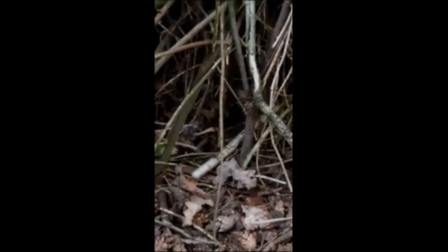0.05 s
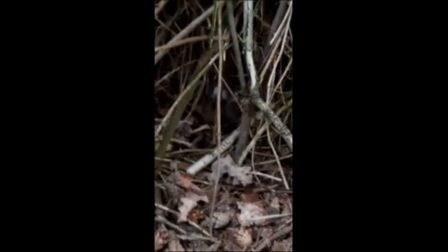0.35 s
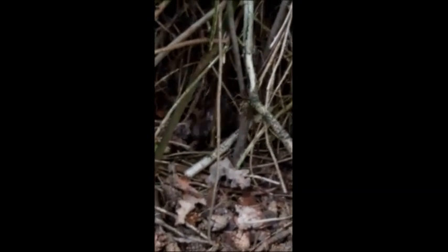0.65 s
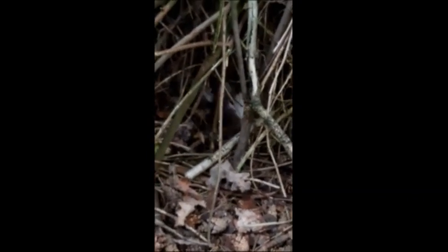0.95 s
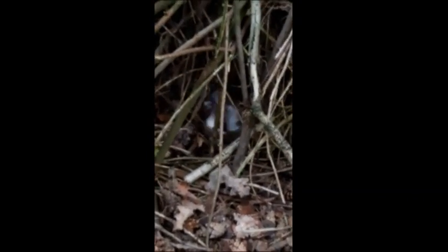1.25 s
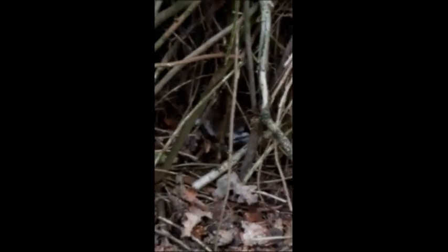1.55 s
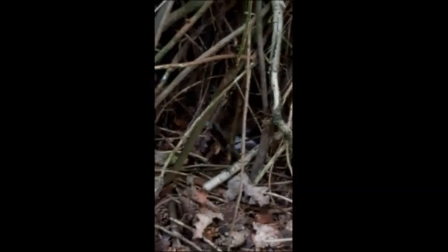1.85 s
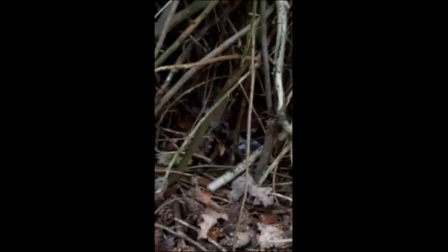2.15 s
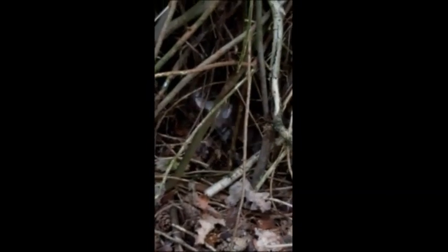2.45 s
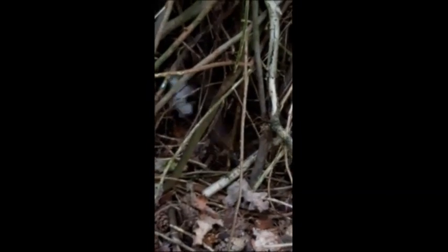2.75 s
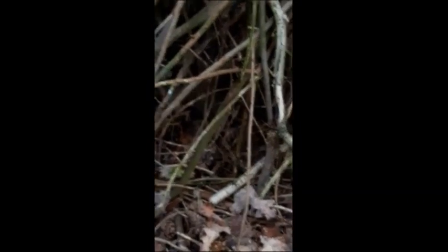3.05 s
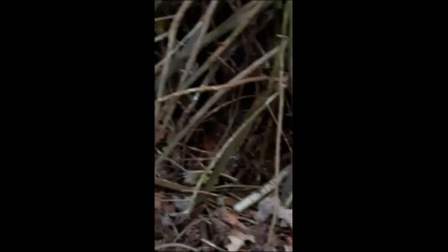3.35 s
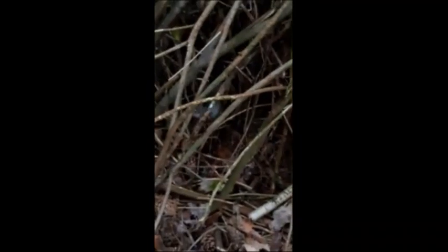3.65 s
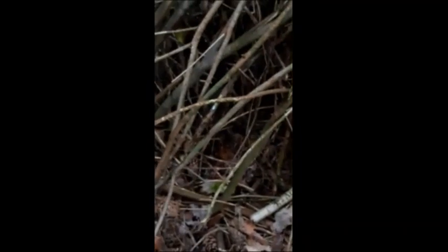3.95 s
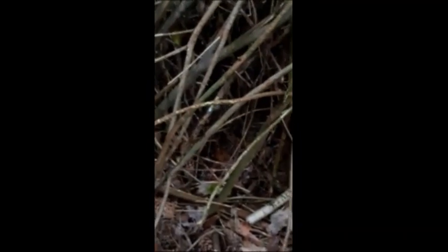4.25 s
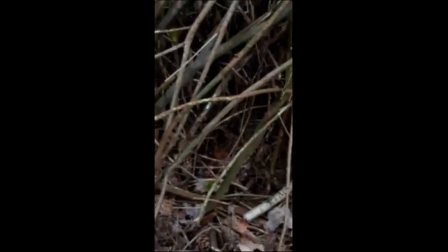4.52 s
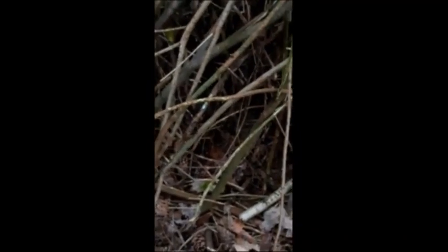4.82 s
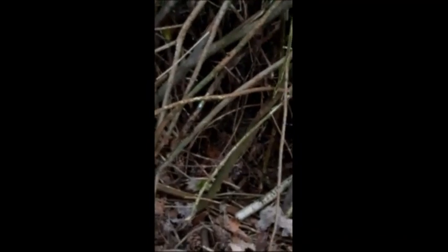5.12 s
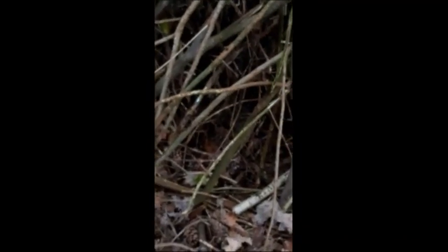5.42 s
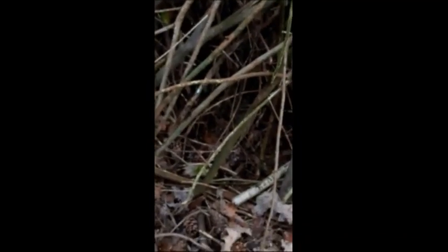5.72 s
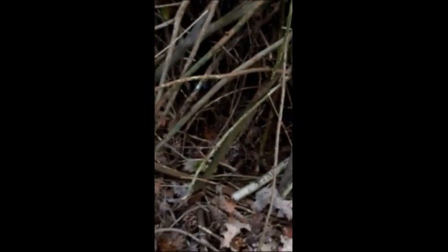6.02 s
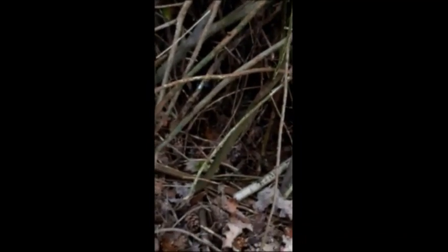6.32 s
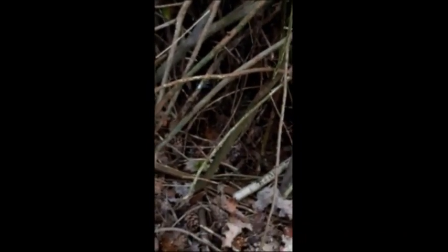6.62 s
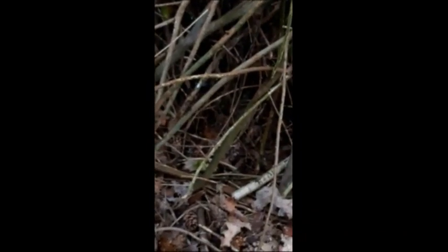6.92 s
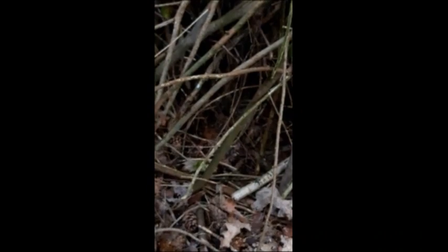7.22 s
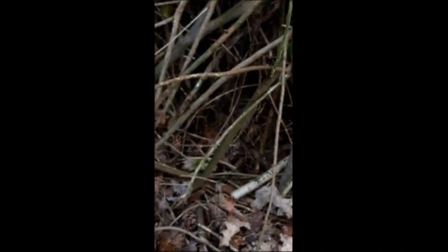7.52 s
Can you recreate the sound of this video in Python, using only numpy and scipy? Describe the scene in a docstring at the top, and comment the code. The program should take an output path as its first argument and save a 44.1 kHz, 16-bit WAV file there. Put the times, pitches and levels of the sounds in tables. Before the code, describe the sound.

In a quiet wood, brief shrill squeaks and rasping shrieks come in irregular bursts from two weasels fighting near the microphone. Between the cries come light rustles of dry leaves, a few sharp twig snaps and faint, dull thuds. The fight eases in the last third, leaving scattered squeaks and the thin whistles of far-off small birds, before one last short cry at the end.

```python
"""Weasels tussling in dry leaves

Two weasels squeak and screech under a thicket. Their vocal folds whistle clean arcs of pitch that
end in a rough flick; forced, the folds turn chaotic and the cry breaks into a rasp. Leaves crackle,
twigs snap and bodies bump the ground. Small birds twitter further off in the quiet wood, over still
air, a distant rumble and a faint drone."""
import sys
import numpy as np
from scipy import signal
from scipy.fft import rfft, irfft, next_fast_len
from scipy.io import wavfile
from scipy.ndimage import uniform_filter1d, map_coordinates

SR = 44100
rng = np.random.default_rng(int(sys.argv[2]) if len(sys.argv) > 2 else 0)


def log_audio(samples):
    """Write samples as a 16-bit WAV file to the path given in sys.argv[1]."""
    # one column per channel
    frames = np.atleast_2d(samples).T
    # limit to full scale, then quantise
    limited = np.clip(frames, -1, 1)
    pcm = np.round(limited * 32767).astype(np.int16)
    wavfile.write(sys.argv[1], SR, pcm)


N = 338247
TIME = np.arange(N) / SR


def gain_of(db):
    """Decibels to amplitude."""
    return 10 ** (np.asarray(db) / 20)


def unit_rms(x):
    """Scales to rms 1."""
    return x / np.sqrt(np.mean(x ** 2) + 1e-20)


def lookup(table, hz):
    """Interpolates a table on a log-frequency axis."""
    f, value = np.transpose(table)
    return np.interp(np.log(hz + 1), np.log(np.abs(f) + 1), value)


def add(mix, start_s, sound):
    """Mixes a sound in at start_s."""
    part = mix[max(round(start_s * SR), 0):][:len(sound)]
    part += sound[:len(part)]


def colour(x, response_db):
    """Filters by a function of frequency."""
    n = x.shape[-1]
    size = next_fast_len(n + 1024)
    return irfft(rfft(x, size) * gain_of(response_db(np.fft.rfftfreq(size, 1 / SR))), size)[..., :n]


def noise(shape, spectrum):
    """Noise with a tabulated spectrum, rms 1."""
    return unit_rms(colour(rng.standard_normal(shape), lambda f: lookup(spectrum, f)))


def wobble(n, hz):
    """Smooth random motion up to about hz, rms 1."""
    return unit_rms(colour(rng.standard_normal(n), lambda f: -10 * np.log10(1 + (f / hz) ** 4)))


def band(n, hz, width_hz):
    """Noise in one steep resonance, rms 1."""
    white = rng.standard_normal(n)
    return unit_rms(colour(white, lambda f: -20 * np.log10(1 + (2 * (f - hz) / width_hz) ** 4)))


def swells(rows, rise_s, fade_s):
    """Gain per sample: each event rises, holds for its length and fades."""
    power = np.zeros(N)
    for start_s, length_s, db in rows:
        away = np.maximum(start_s - TIME, 0) / rise_s + np.maximum(TIME - start_s - length_s, 0) / fade_s
        power += gain_of(2 * db) * np.exp(-2 * np.minimum(away, 30))
    return np.sqrt(power)


# Port phase: (frequency [Hz], left lead [rad])
PORT_PHASE_RAD = [(2300, 0), (3300, -1.3), (4400, -2.1), (4800, 1.3), (5300, .2), (6300, -.3), (7300, -1.2),
                  (8500, .3), (10500, 1.4), (12200, 0), (16000, -.3)]
# Port balance: (frequency [Hz], left minus right [dB])
PORT_BALANCE_DB = [(60, .5), (250, -2.5), (1000, 0), (2400, -3.03), (4400, 1.5), (8000, 5), (11000, 1.5),
                   (14000, 4)]


def ports(x):
    """Sound from ahead reaches two microphone ports with different phase and level."""
    size = next_fast_len(N + 2048)
    hz = np.fft.rfftfreq(size, 1 / SR)
    left = gain_of(lookup(PORT_BALANCE_DB, hz) / 2) * np.exp(1j * lookup(PORT_PHASE_RAD, hz) / 2)
    pair = np.array([left, 1 / left])
    return irfft(rfft(x, size) * pair / np.sqrt(np.mean(abs(pair) ** 2, 0)), size)[:, :N]


def sway(pair, spread_samples=0.98, lead_samples=0.3):
    """The delay between the ports shifts as the animals dart about."""
    shift = (spread_samples * wobble(N, 10) + lead_samples) / 2
    at = np.arange(N)
    return np.array([map_coordinates(x, [at + side * shift], order=5) for x, side in zip(pair, (1, -1))])


# Reverberation of the wood: (frequency [Hz], T60 [s])
WOOD_T60_S = [(200, .25), (2000, .25), (3500, .21), (5300, .26), (9000, .25), (15000, .17)]


def wood(x, stems_db, trunks_db, stems_decay_s=0.0081):
    """Near stems scatter the sound at once; far trunks give a short tail."""
    t = np.arange(SR // 2) / SR
    taps = rng.standard_normal((2, len(t))) * (rng.random((2, len(t))) < .12) * (t > .001)
    hz, frame_s, frames = signal.stft(taps, SR, nperseg=256)
    decay = gain_of(-60 * frame_s / lookup(WOOD_T60_S, hz)[:, None])
    trunks = signal.istft(frames * decay, SR, nperseg=256)[1][:, :len(t)]
    stems = taps[::-1] * np.exp(-t / stems_decay_s)
    echo = gain_of(stems_db) * stems / np.linalg.norm(stems[0])
    echo += gain_of(trunks_db) * trunks / np.linalg.norm(trunks[0])
    return signal.fftconvolve(x[None], echo, axes=1)[:, :N]


# Still air: (frequency [Hz], density [dB])
AIR_SPECTRUM = [(15, -43.5), (28, -23.5), (58, -0.5), (114, -0.5), (206, -14), (363, -18), (439, -15.5),
                (754, -21), (887, -17.5), (3100, -33.5), (4200, -23.5), (5140, -33), (6380, -16),
                (8140, -35), (14800, -29), (16000, -45.5)]
# Rumble envelope: (time [s], level [dB])
RUMBLE_LEVELS = [(0.0, -63.5), (3.97, -72.5), (7.02, -72), (7.66, -62.5)]
# Rumble colour: (frequency [Hz], density [dB])
RUMBLE_SPECTRUM = [(25, -25), (55, -2.5), (110, 4.5), (170, -3.5), (260, -13), (500, -22.5), (1200, -26.5),
                   (3000, -27.5)]


def ambience(air_db=-69, rumble_trim_db=-1, diffuse_above_hz=230):
    """Still air and a distant rumble; the bass is nearly the same at both ports."""
    air = gain_of(air_db) * noise((3, N), AIR_SPECTRUM)
    rumble_db = np.interp(TIME, *np.transpose(RUMBLE_LEVELS)) + rumble_trim_db
    bed = air + gain_of(rumble_db) * noise((3, N), RUMBLE_SPECTRUM)
    diffuse = colour(bed[:2], lambda f: -10 * np.log10(1 + (diffuse_above_hz / (f + 40)) ** 2))
    return 0.84 * ports(bed[2]) + 0.45 * diffuse


# Drone swells: (time [s], length [s], level [dB])
DRONE_SWELLS = [(0, 1, -86.5), (3.7, 0.92, -89), (6.5, 0.61, -82.5)]
# Drone partials: (frequency [Hz], level [dB])
DRONE_TONES = [(435, 0.5), (652, -5), (870, -5.5)]


def drone(width_hz=14):
    """Narrow, wavering tones come and go far away."""
    tones = sum(gain_of(db) * band(N, hz, width_hz) for hz, db in DRONE_TONES)
    return swells(DRONE_SWELLS, rise_s=.15, fade_s=0.37) * tones


# Far bird calls: (time [s], length [s], level [dB])
LOW_CALLS = [(0, 0.415, -73), (.8, 0.43, -71.5), (1.63, 0.12, -66), (1.82, 0.276, -70.5),
             (6.08, 0.082, -78.5)]


def far_bird():
    """A low call: swells of narrow-band noise."""
    return swells(LOW_CALLS, rise_s=0.027, fade_s=0.039) * band(N, hz=1850, width_hz=520)


# Buzzy bird notes: (time [s], length [s], level [dB])
BUZZY_NOTES = [(0.8, .14, -70.5), (1.182, 0.26, -65), (1.491, 0.13, -57), (1.664, .15, -59),
               (1.833, 0.091, -52), (5.618, .064, -61), (5.805, .13, -60), (6.159, 0.0884, -64.5),
               (6.265, 0.15, -55), (6.46, 0.064, -56), (6.817, 0.046, -47), (7.248, .1, -74.5),
               (7.444, 0.126, -69)]


def bird_twitters(flutter_db=3.8):
    """Short notes of high, fluttering noise."""
    out = np.zeros(N)
    for start_s, length_s, db in BUZZY_NOTES:
        n = int(length_s * SR)
        buzz = band(n, hz=6330, width_hz=2200) * gain_of(flutter_db * wobble(n, 90))
        add(out, start_s, gain_of(db) * buzz * signal.windows.tukey(n, .3))
    return out


# Slurred bird notes: (time [s], length [s], start pitch [Hz], end pitch [Hz], level [dB])
SLURRED_NOTES = [(0, .07, 4150, 4550, -59.5), (2.11, .035, 3460, 2993, -66),
                 (2.204, 0.024, 3830, 2969, -69.5), (2.285, 0.046, 4030, 3080, -67),
                 (4.569, 0.2, 6930, 6150, -55.5), (6.132, 0.0694, 6970, 6600, -62.5),
                 (6.424, .085, 3830, 4720, -58), (6.608, 0.085, 3880, 4480, -60.5),
                 (6.811, 0.045, 3880, 4250, -61.5), (7.273, 0.096, 6950, 6700, -62.5),
                 (7.415, 0.037, 7000, 6770, -58.5)]


def bird_whistles(trim_db=8, jitter=0.017):
    """Pure tones glide with a slight tremble."""
    out = np.zeros(N)
    for start_s, length_s, start_hz, end_hz, db in SLURRED_NOTES:
        progress = np.linspace(0, 1, int(length_s * SR))
        hz = start_hz + (end_hz - start_hz) * np.sin(np.pi / 2 * progress)
        hz *= 1 + jitter * wobble(len(hz), 250)
        tone = np.sin(2 * np.pi * np.cumsum(hz) / SR)
        add(out, start_s, gain_of(db + trim_db) * tone * np.sin(np.pi * progress))
    return out


# Scuffles: (time [s], length [s], level [dB])
LEAF_SCUFFLES = [(0, .02, -63), (.16, 0.049, -44), (.36, 0.012, -60.5), (.52, 0.17, -54.5),
                 (.72, 0.174, -59.5), (.93, 0.33, -57.5), (1.575, 0.023, -55), (2.45, 0.0944, -49.5),
                 (2.7, .14, -52.5), (2.95, 0.18, -55), (3.32, 0.22, -59), (3.58, 0.17, -53.5),
                 (3.76, 0.067, -53), (3.93, 0.064, -48), (4.05, 0.049, -50.5), (4.78, .17, -49),
                 (5.51, 0.019, -83.5), (7.1, .08, -65), (7.27, 0.13, -66), (7.47, 0.046, -51.5),
                 (7.6, 0.061, -73)]
# Dry leaves: (frequency [Hz], density [dB])
LEAF_SPECTRUM = [(100, -15), (450, -8.5), (1200, -8.5), (2400, 1), (3500, 1.5), (5800, 8.5), (8000, -4),
                 (12000, -0.5), (15500, 0.5)]


def leaves(cracks_per_s=1100, crack_decay_s=57e-6, spread_db=5, brush_db=-6, rest_db=-75, trim_db=1):
    """Dry leaves break in tiny cracks over a soft brushing."""
    size = gain_of(spread_db * np.minimum(rng.exponential(1, (2, N)), 4))
    impulses = size * rng.choice([-1, 1], (2, N)) * (rng.random((2, N)) < cracks_per_s / SR)
    t = np.arange(200) / SR
    crack = rng.standard_normal(len(t)) * np.exp(-t / crack_decay_s)
    cracks = signal.oaconvolve(impulses.sum(0), crack)[:N]  # two streams, each at cracks_per_s
    rustle = unit_rms(cracks) + gain_of(brush_db) * rng.standard_normal(N)
    clumps = gain_of(1.6 * wobble(N, 27))
    rustle = colour(rustle * clumps, lambda f: lookup(LEAF_SPECTRUM, f))
    stir = swells(LEAF_SCUFFLES, rise_s=0.017, fade_s=0.055) + gain_of(rest_db)
    return gain_of(trim_db) * stir * unit_rms(rustle)


def knocks(rows, spectrum, decay_s, trim_db):
    """Each blow is a fast-dying noise burst in the colour of what was struck."""
    out, t = np.zeros(N), np.arange(4096) / SR
    for start_s, db in rows:
        add(out, start_s, gain_of(db + trim_db) * noise(len(t), spectrum) * np.exp(-t / decay_s))
    return out


# Ground bumps: (time [s], level [dB])
BODY_BUMPS = [(.16, -68), (.21, -73), (.52, -63.5), (.95, -75), (1.13, -71), (2.44, -64.5), (3.055, -62),
              (3.12, -65), (3.69, -60.5), (3.765, -56), (3.97, -63.5), (4.8, -65), (4.96, -64.5),
              (7.48, -70)]
# Soil: (frequency [Hz], density [dB])
SOIL_SPECTRUM = [(60, -8.5), (150, 2.5), (300, -15.5), (600, -13.5), (950, -2.5), (1600, -18),
                 (4000, -35.5)]


def body_bumps():
    """Bodies hit the soil with dull thuds."""
    return knocks(BODY_BUMPS, SOIL_SPECTRUM, decay_s=0.03, trim_db=2.5)


# Twig and leaf snaps: (time [s], level [dB])
TWIG_SNAPS = [(.768, -25.5), (.944, -32.5), (1.565, -51), (2.867, -32.5), (3.053, -26), (3.831, -39.5),
              (5.489, -62.5), (6.719, -52.5), (7.115, -42), (7.509, -34.5)]
# Dry twig: (frequency [Hz], density [dB])
TWIG_SPECTRUM = [(300, -15.5), (1500, -9.5), (3000, 0), (5800, 5.5), (8000, -1.5), (12000, 1.5),
                 (15500, 2.5)]


def twig_snaps():
    """Dry twigs break with bright clicks."""
    return knocks(TWIG_SNAPS, TWIG_SPECTRUM, decay_s=0.0025, trim_db=-8)


def treble_share(hz):
    """0 to 1: rises above the main throat resonance."""
    return 1 / (1 + (7800 / (hz + 1)) ** 16)


def bass_share(hz):
    """0 to 1: rises below the main throat resonance."""
    return 1 / (1 + (hz / 3700) ** 16)


# Weasel throat: (frequency [Hz], gain [dB])
THROAT_RESPONSE = [(900, -26), (1500, -23), (2200, -2), (3300, -0.5), (4500, -3.5), (5800, 5), (6800, 0),
                   (7800, -10.5), (9000, -3), (10700, -1), (13000, -4.5), (15500, -6.5)]


def vocal_folds(pitch_hz, rough, treble_db, bass_db, jitter=0.09, lurch=.06, chaos_full=0.19,
                doubling=0.2, waver_db=2, top_hz=16500):
    """Folds whistle nine harmonics through the throat; as they turn chaotic the pitch shakes."""
    n = len(pitch_hz)
    chaos = jitter * np.minimum(rough / chaos_full, 1) * wobble(n, 600) + lurch * wobble(n, 130)
    cycles = np.cumsum(pitch_hz * (1 + 0.0055 * wobble(n, 120) + rough ** 1.5 * chaos)) / SR
    harmonic = np.arange(1, 10)[:, None]
    hz = harmonic * pitch_hz
    low_fundamental = (harmonic == 1) * bass_share(0.83 * hz)
    weight_db = lookup(THROAT_RESPONSE, hz) + treble_db * treble_share(hz) + bass_db * low_fundamental
    weight_db += waver_db * np.array([wobble(n, 39) for _ in harmonic])
    weight = gain_of(weight_db) * (hz < 18000) / np.sqrt(1 + (hz / top_hz) ** 10)
    partials = weight * np.sin(2 * np.pi * (harmonic * cycles + rng.random(harmonic.shape)))
    voice = partials.sum(0) / np.sqrt((weight ** 2).sum(0) / 2)
    # forced folds alternate strong and weak cycles, in fits
    return voice * (1 + doubling * rough * wobble(n, 80) * np.cos(np.pi * cycles))


def breath(n, treble_db, bass_db):
    """Turbulent air passes the same throat; level held near rms 1."""
    air = colour(rng.standard_normal(n), lambda f: lookup(THROAT_RESPONSE, f))
    low = colour(air, lambda f: 20 * np.log10(bass_share(f) + 1e-9))
    high = colour(air, lambda f: 20 * np.log10(treble_share(f) + 1e-9))
    air += low * (gain_of(np.minimum(bass_db + 1, 0)) - 1)
    air += high * (gain_of(treble_db - 3) - 1)
    return air / np.sqrt(uniform_filter1d(air ** 2, size=300) + 1e-12)


def cry(effort_db, pitch_hz, rough, treble_db, bass_db, rasp_db=1.5, hiss_db=-40, flutter=0.32,
        shimmer_db=0.77, attack_s=0.0017, fade_s=0.008, mouth_hz=1380):
    """Folds plus breath: with roughness the air takes over and the level flutters."""
    n = len(pitch_hz)
    t = np.arange(n) / SR
    rough = np.clip(rough, 0, 1)
    breathy = rough ** 1.5
    voice = np.sqrt(1 - breathy ** 2) * vocal_folds(pitch_hz, rough, treble_db, bass_db)
    air = (gain_of(rasp_db) * breathy + gain_of(hiss_db)) * breath(n, treble_db, bass_db)
    shake = unit_rms(np.exp(flutter * rough * wobble(n, 260)) * gain_of(shimmer_db * wobble(n, 110)))
    fade = np.clip(np.minimum(t / attack_s, (t[-1] - t) / fade_s), 0, 1)
    sound = gain_of(effort_db) * (voice + air) * shake * fade
    # so small a mouth radiates no bass
    return colour(sound, lambda f: -10 * np.log10(1 + (mouth_hz / (f + 50)) ** 14))


# Squeaks: (time [s], length [s], effort [dB], swell [dB], start pitch [Hz], middle pitch [Hz],
# end pitch [Hz], roughness [0-1], treble [dB], fundamental [dB], closing flick [dB])
SQUEAK_NOTES = [(1.072, 0.05025, -21, 4.5, 3280, 3457, 3324, 0.08, 0.5, -8, -6),
                (1.324, 0.072, -32, 9.5, 3816, 3930, 3997, 0.03, -8, -14.5, 5.5),
                (1.372, 0.047, -28, 1, 2063, 2021, 2124, 0.11, -2.5, -8.5, -14),
                (2.009, 0.06, -25.5, 8, 2370, 2621, 2433, 0.14, 4, -13.5, -4),
                (2.483, 0.05195, -25.5, 8.5, 2790, 2635, 2670, 0.14, -0.5, -10, -0.5),
                (2.67, 0.059, -34, 1.5, 2240, 2560, 2355, 0.37, -5, -13, 7),
                (2.943, 0.022, -32, -4, 3966, 3210, 2856, 0, -3, -3, 6),
                (3.687, 0.015, -24.5, -7.5, 2970, 2707, 2687, 0.1, -6, -11, -2.5),
                (4.001, 0.06, -38.5, -19, 2565, 2410, 2320, 0.29, -11.5, -14, 14.5),
                (4.232, 0.07, -38.5, 8.5, 2050, 2188, 2325, 0.15, -8.5, -10, -3),
                (4.434, 0.079, -40.5, 7, 3517, 3510, 3402, 0.05, -13, 8.5, 3.5),
                (4.462, 0.041, -35.5, -2, 1876, 2330, 2275, 0.1, -1, -11.5, -2.5),
                (4.668, 0.0789, -36, 11, 2290, 2444, 2317, 0.21, -3.5, -6.5, -12.5),
                (4.694, 0.051, -33, -1.5, 3160, 3950, 4220, 0.04, -1.5, -10.5, -7),
                (4.848, 0.034, -32.5, -4.5, 4810, 4250, 4577, 0.06, -4, -14, -7.5),
                (5.125, 0.0409, -45, 9.5, 2251, 2193, 2290, 0.09, -1, -6.5, -4.5),
                (6.332, 0.0413, -34.5, 8, 2370, 2340, 2400, 0.17, -9.5, -13.5, -2.5),
                (6.771, 0.032, -40.5, 2, 2035, 2154, 2376, 0.23, -9.5, -13, 2),
                (7.003, 0.01, -37, -1, 2625, 2443, 2399, 0.09, -8.5, -10, 3.5),
                (7.234, 0.013, -42, 16, 1950, 2089, 2620, 0.32, -24.5, -3, -7.5),
                (7.462, 0.0545, -54.5, -3, 1955, 2429, 2196, 0.24, -26, -2, -3)]


def squeaks(catch_s=0.0024, flick_s=.004, release_s=.017, arch_db=1.5, release_db=-24):
    """Each clear note catches, follows one arc of pitch, then flicks up roughly and dies."""
    out = np.zeros(N)
    for start_s, length_s, db, swell_db, *arc_hz, rough, treble_db, bass_db, flick_db in SQUEAK_NOTES:
        t = np.arange(0, length_s + flick_s + release_s, 1 / SR)
        progress = np.minimum(t / length_s, 1)
        catch = np.exp(-t / catch_s)
        flick = np.clip((t - length_s) / flick_s, 0, 1)
        release = np.clip((t - length_s - flick_s) / release_s, 0, 1)
        pitch_hz = np.polyval(np.polyfit([0, .5, 1], arc_hz, deg=2), progress)
        pitch_hz *= 1 + .05 * catch + .2 * flick - 0.29 * release
        effort_db = db + swell_db * (progress - .5) + arch_db * (np.sin(np.pi * progress) - 2 / np.pi)
        effort_db += flick_db * flick + release_db * release
        roughness = rough + 0.19 * catch + 0.35 * flick
        add(out, start_s, cry(effort_db, pitch_hz, roughness, treble_db, bass_db))
    return out


# Screeches: (treble [dB], fundamental at easy effort [dB], curve)
# Curve points: (time [s], effort [dB], pitch [Hz], roughness [0-1])
SCREECH_CURVES = [ (2, -1.5, [(.086, -37.5, 1900, .15), (.134, -28, 2240, .15), (.141, -19, 2709, 0.27),
                  (.16, -14.5, 2750, 0.72), (.178, -15.5, 2880, 0.51), (.195, -21.5, 2960, 0.68),
                  (.208, -28.5, 2764, 0.44), (.222, -17, 2453, 0.77), (.238, -39.5, 2040, 0.92)]),
                  (-5.5, -9, [(.474, -35, 2030, 0.33), (.482, -31, 2194, 0.54), (.489, -21, 2928, 0.37),
                  (.512, -20, 3064, 0.65), (.53, -24.5, 2643, 0.94), (.55, -27.5, 2323, 0.63),
                  (.565, -33.5, 2650, 0.9), (.6, -37.5, 2500, 0.67)]), (-21, 18, [(.56, -25, 4320, 0.66),
                  (.573, -29.5, 3750, 0.64), (.59, -31, 3450, 0.56), (.602, -50, 3000, 0.5)]),
                  (2, -4.5, [(2.425, -26, 2490, 0.48), (2.434, -16, 2984, .25), (2.446, -21.5, 2667, 0.77),
                  (2.466, -16, 2450, 0.69), (2.478, -32, 2600, 0.63), (2.488, -33.5, 2830, 0.1)]),
                  (-0.5, -5.5, [(2.804, -30, 3920, 0.4), (2.808, -24.5, 4110, .5),
                  (2.817, -45, 3100, 0.35)]), (-2.5, -10.5, [(2.894, -33.5, 2357, 0.16),
                  (2.924, -35, 2433, 0.24), (2.933, -17.5, 2601, 0.27), (2.942, -30, 2987, 0.71),
                  (2.955, -34.5, 2567, 0.6), (2.972, -30, 2244, 0), (2.98, -47, 2390, 0.47)]),
                  (-4.5, -10, [(3.454, -24.5, 2670, .4), (3.459, -29, 2390, 0.13), (3.476, -26.5, 2500, 0),
                  (3.497, -25.5, 2415, 0.03), (3.51, -29.5, 2494, 0.02), (3.528, -24.5, 2655, 0.1),
                  (3.557, -31, 2460, .06), (3.563, -25, 3210, 0.2), (3.571, -61, 2800, 0.76)]),
                  (-0.5, -7.5, [(3.961, -30.5, 1977, 0.2), (3.972, -30, 2550, 0.51),
                  (3.987, -29, 2804, 1.06), (3.999, -39, 2450, 0.54)]),
                  (-4.5, -26, [(4.748, -36, 4700, 0.63), (4.775, -28, 5500, 0.7), (4.805, -32, 5750, 0.65),
                  (4.835, -18.5, 5700, 0.39), (4.848, -30, 5400, 0.52), (4.857, -25, 4700, 0.6)]),
                  (-13.5, -8.5, [(4.915, -32, 1967, 0.54), (4.928, -37.5, 2348, 0.3),
                  (4.938, -34.5, 2786, 0.6), (4.955, -44.5, 2588, .6), (4.968, -30.5, 2606, 0.82),
                  (4.985, -40.5, 2180, 1), (4.996, -44, 2057, .8)]), (5, -9.5, [(7.664, -40.5, 2810, 0.65),
                  (7.669, -24.5, 2925, 0.5)]), ]


def screeches(easy_db=-31, loss_db_per_db=0.67):
    """Forced cries: effort drives the sound from the fundamental up into the overtones."""
    out = np.zeros(N)
    for treble_db, fundamental_db, curve in SCREECH_CURVES:
        times_s, *columns = np.transpose(curve)
        t = np.arange(times_s[0], times_s[-1] + .004, 1 / SR)
        effort_db, pitch_hz, rough = (np.interp(t, times_s, column) for column in columns)
        bass_db = fundamental_db - loss_db_per_db * (effort_db - easy_db)
        add(out, times_s[0], cry(effort_db, pitch_hz, rough, treble_db, bass_db))
    return out


def scene():
    """The fight close by, the birds far off."""
    weasels = gain_of(-0.22) * (squeaks() + screeches())
    fight = weasels + leaves() + twig_snaps() + body_bumps()
    birds = far_bird() + bird_twitters() + bird_whistles()
    near = sway(ports(fight)) + wood(fight, stems_db=-6.5, trunks_db=-14)
    far = gain_of(-4.5) * ports(birds) + wood(birds, stems_db=-12, trunks_db=-6.5)
    return near + far + ambience() + drone()


def record(dry, ceiling=0.93, edge_hz=16000):
    """Soft-clips the loudest peaks, then limits the band."""
    rounded = dry / (1 + (np.abs(dry) / ceiling) ** 4) ** (1 / 4)
    lowpass = signal.firwin(401, edge_hz, window=("kaiser", 8), fs=SR)
    return signal.oaconvolve(rounded, lowpass[None], "same")


dry = scene()
out = record(dry)
log_audio(out)
```